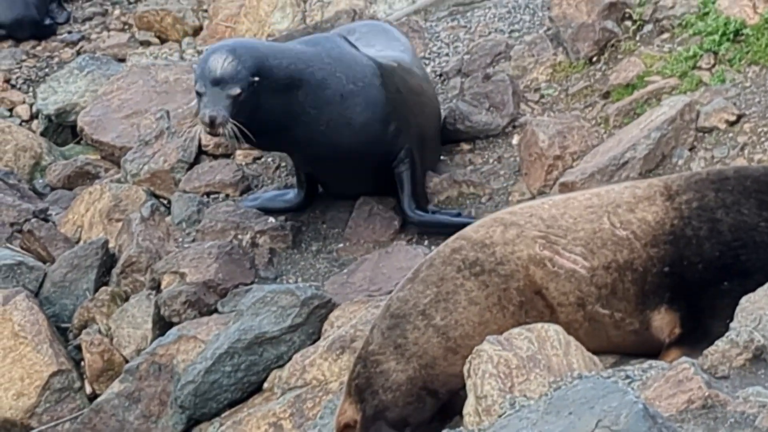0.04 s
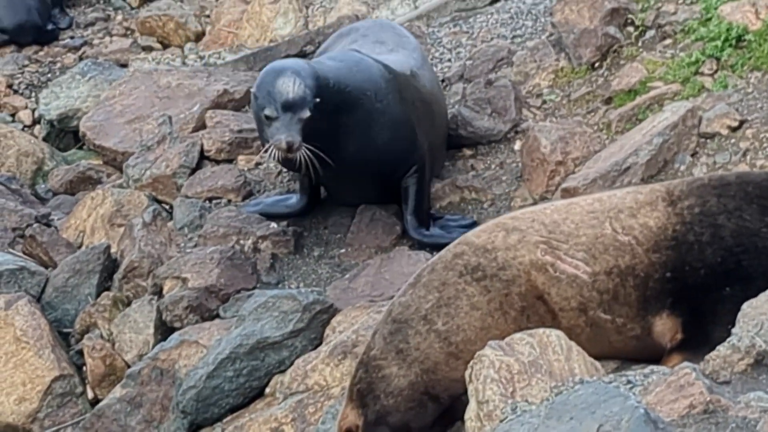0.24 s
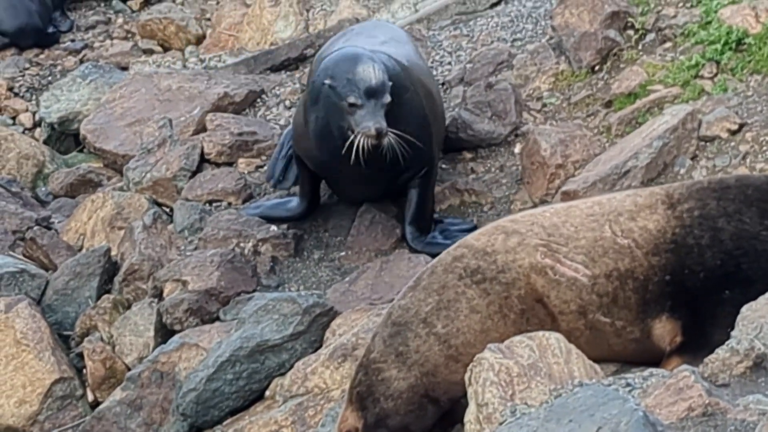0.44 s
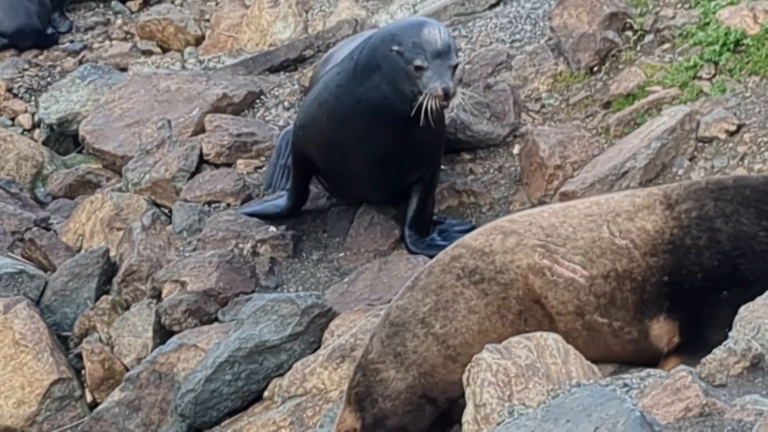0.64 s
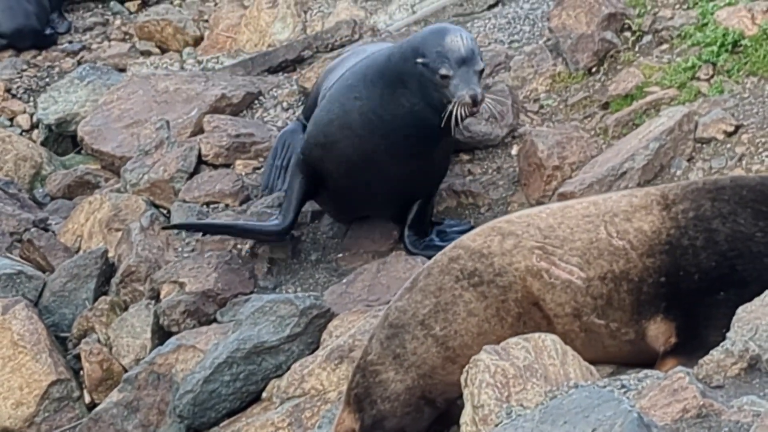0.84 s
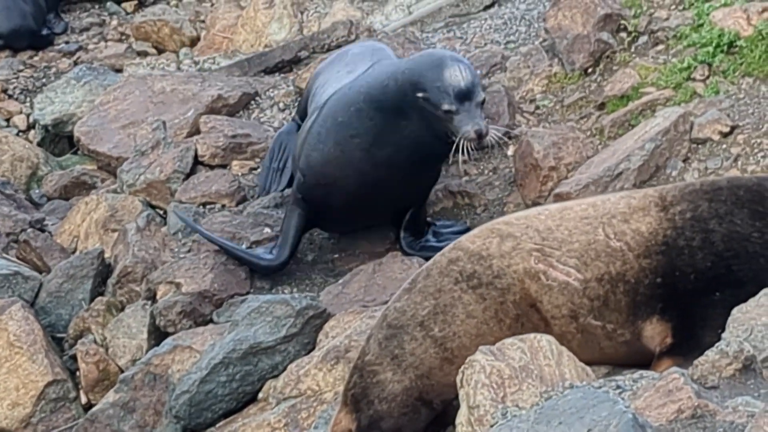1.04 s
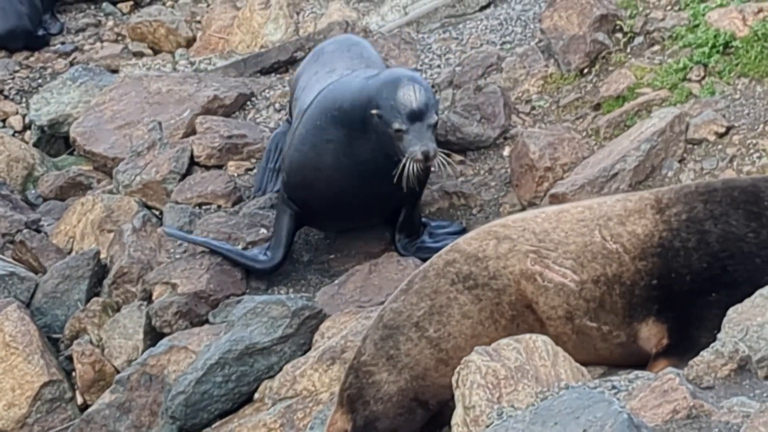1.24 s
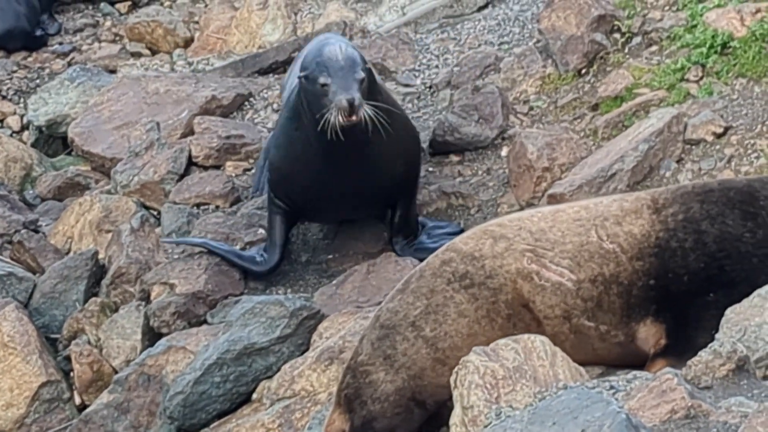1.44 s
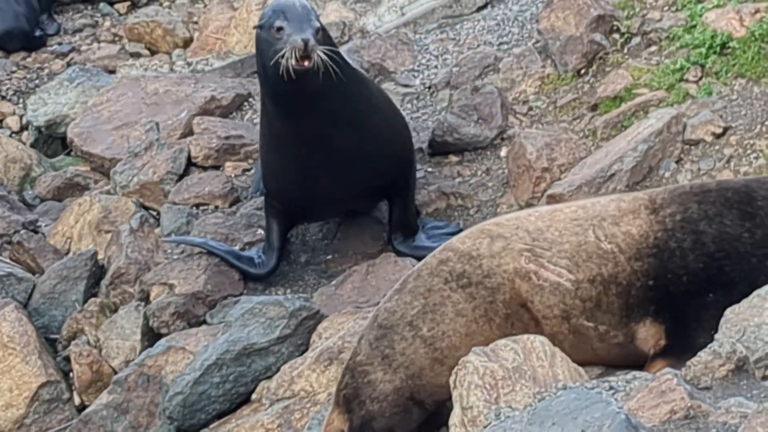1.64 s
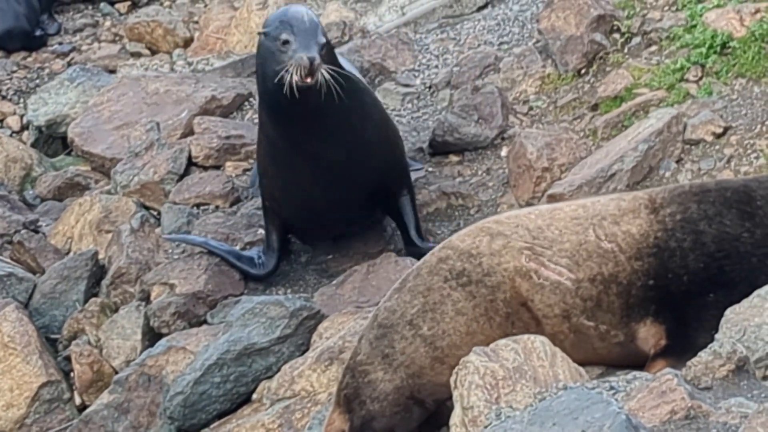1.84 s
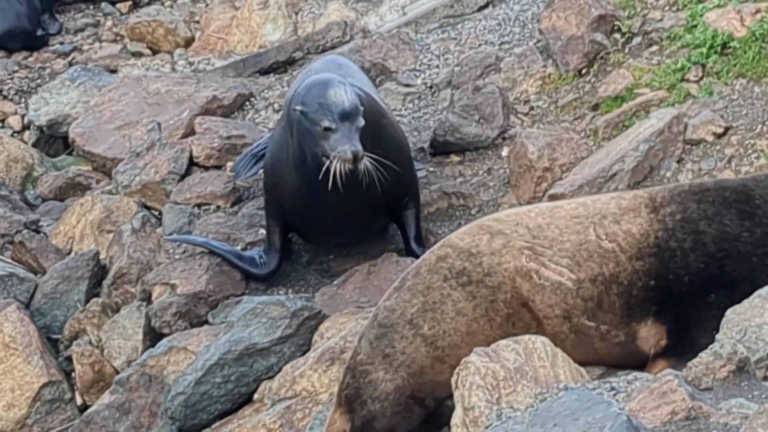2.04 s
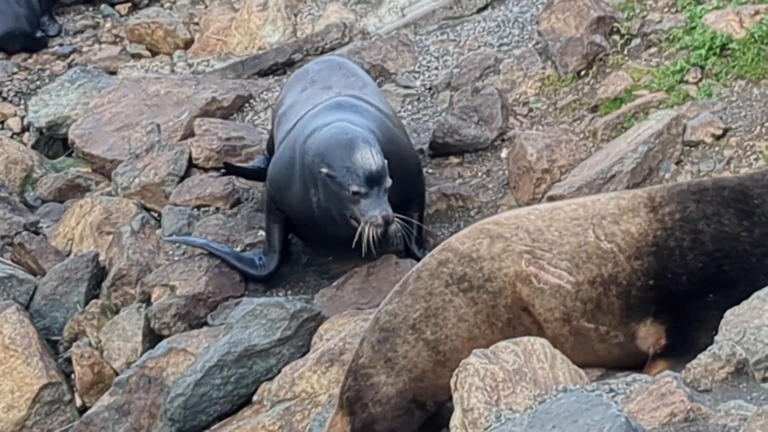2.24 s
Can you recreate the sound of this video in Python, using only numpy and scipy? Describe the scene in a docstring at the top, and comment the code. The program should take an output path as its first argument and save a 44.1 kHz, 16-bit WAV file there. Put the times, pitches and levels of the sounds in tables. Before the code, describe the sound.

A sea lion barks five times, about twice a second, each bark a loud, raspy honk. It is a few metres away on a rocky shore, with short echoes and faint surf and wind behind.

```python
"""A sea lion barks five times, twice a second, on a rocky shore a few metres away.
Each bark is a source and a filter: the vocal folds drive resonances of the throat and mouth, starting
in hoarse strong-weak pulses, clearing to a dipping pitched honk and fraying into breath.
Boulders scatter short echoes. Behind are a breath drawn in, a far call, a few small ticks
and the broadband noise of surf and wind."""
import sys
import numpy as np
from scipy import signal
from scipy.fft import rfft, irfft, next_fast_len
from scipy.io import wavfile
from scipy.ndimage import uniform_filter1d

SR = 44100
rng = np.random.default_rng(int(sys.argv[2]) if len(sys.argv) > 2 else 0)


def to_wav(sig):
    """Store sig (one row per channel, or 1-D mono) as 16-bit WAV at the path in sys.argv[1].

    Samples outside -1..1 are clipped; the rate is SR.
    """
    pcm = np.clip(np.atleast_2d(sig), -1, 1) * 32767
    pcm = np.round(pcm).astype(np.int16)
    wavfile.write(sys.argv[1], SR, pcm.T)  # frames by channels


N = 100195
T = np.arange(N) / SR

# Per bark, rows of: time_s, pitch_hz, voice_db, rasp_db, mouth_resonance_hz, upper_throat_gain_db
BARK_CONTOURS = [
    [(0, 249.8, -12.5, -22.5, 2650, -9), (.03, 250.9, -17, -24.5, 3050, -6.5),
     (.07, 249.5, -16, -24.5, 2740, -7.5), (.11, 248, -17.5, -25, 2900, -4),
     (.145, 245.5, -18.5, -27, 2930, 0), (.166, 240.2, -25, -23, 3200, -9.5),
     (.182, 243.3, -29.5, -35.5, 3180, 1), (.23, 242.6, -44.5, -48.5, 3080, -7)],
    [(.39, 248.7, -73, -58, 3000, 11), (.456, 248.5, -54, -37.5, 3080, 1),
     (.49, 264.5, -34, -36.5, 2930, -3), (.502, 268, -21.5, -27, 2920, 9),
     (.526, 261.8, -19, -28.5, 3070, 1), (.568, 228.2, -13.5, -29, 2870, 7.5),
     (.605, 241.1, -13, -28.5, 2630, -2.5), (.644, 265.3, -17, -28.5, 2540, 0),
     (.668, 246.2, -23, -31, 2600, 8), (.692, 239.5, -22.5, -33, 2620, -11),
     (.706, 249.3, -34, -40.5, 2830, 9), (.76, 231, -55, -47.5, 3240, 11)],
    [(.953, 264.5, -46, -43, 3020, 5), (.972, 265.3, -25, -30.5, 3030, 3),
     (.982, 261.7, -19, -26, 2990, 8.5), (1.001, 260.5, -14.5, -21.5, 2810, -6.5),
     (1.029, 248.8, -14.5, -30.5, 2870, 3.5), (1.061, 227.6, -17, -28.5, 2880, 10),
     (1.075, 228.1, -14.5, -32, 2850, 6), (1.095, 239.4, -14, -30.5, 2730, 10.5),
     (1.139, 257.8, -20.5, -32.5, 2900, 3.5), (1.183, 236, -26, -38.5, 3000, 3),
     (1.195, 237.7, -28.5, -70, 2940, -3), (1.24, 240, -37.5, -74, 3000, -3)],
    [(1.474, 254, -29.5, -34.5, 3000, -7), (1.486, 245.1, -19.5, -28, 2980, -10),
     (1.506, 243.2, -19, -25.5, 2830, 0), (1.524, 251.2, -14.5, -27.5, 2840, -6.5),
     (1.554, 223.6, -15.5, -23.5, 2950, -5.5), (1.57, 216.3, -15, -29.5, 3000, 0.5),
     (1.6, 221, -16.5, -26.5, 2940, -0.5), (1.638, 248, -12, -25, 2820, -1.5),
     (1.672, 255, -20.5, -31, 3050, 0.5), (1.692, 254, -20, -31.5, 2970, 1),
     (1.744, 251, -44, -72, 2980, -11), (1.76, 250, -45, -65, 3000, -2)],
    [(1.963, 280, -24, -47, 3100, -2), (1.969, 278.1, -26.5, -34.5, 3200, -4),
     (1.999, 275.8, -17, -26, 3000, 2), (2.045, 214.7, -15, -25.5, 2950, 7),
     (2.091, 225.4, -14.5, -28.5, 3060, 5.5), (2.139, 250.7, -16, -27.5, 2880, 0.5),
     (2.175, 251.8, -22, -31, 2880, -2.5), (2.203, 261, -27, -29, 3070, -1),
     (2.225, 270.6, -32.5, -38.5, 3000, 2), (2.263, 278, -53, -84, 3050, -1),
     (2.27, 274.6, -50, -75, 3050, 2)],
]
# Clear middle of each bark: start_s, end_s, hoarse_share
CLEAR_SPANS = [(.04, .13, .7), (.55, .655, .11), (1.04, 1.145, .17), (1.555, 1.65, .22), (2.025, 2.155, .2)]
# Per bark: hiss_db, relative to the rasp
HISS_OFFSETS = [-27, -14.5, -19.5, -19, -17.5]
def bark(contour, clear_span, hiss_db, throat_db, stretch, mouth_db):
    """Source-filter voicing: irregular fold vibration turns mostly periodic, then breaks up again."""
    times, pitch_hz, voice_db, rasp_db, mouth_hz, upper_db = np.transpose(contour)
    t = np.arange(times[0], times[-1], 1 / SR)
    pitch_hz = uniform_filter1d(np.interp(t, times, pitch_hz), 400)
    mouth_hz = uniform_filter1d(np.interp(t, times, mouth_hz), 800)
    upper_db = uniform_filter1d(np.interp(t, times, upper_db), 1500)
    clears, frays, share = clear_span
    turn_s, fade_s = .028, .003
    hoarse = np.interp(t, [clears - turn_s, clears, frays, frays + turn_s], [1, share, share, 1])
    cycles = np.cumsum(pitch_hz) / SR
    wobble, air, turbulence = rng.standard_normal((3, len(t)))
    rough, puffs = hoarse_folds(cycles, hoarse, wobble, air)
    honk = throat(periodic_folds(cycles), throat_db, stretch, upper_db, bass_db=0)
    growl = throat(rough, throat_db, stretch, upper_db, bass_db=-4)
    voice = -np.sqrt(1 - hoarse) * honk - np.sqrt(hoarse) * growl
    rasp = mouth_rasp(rough + .5 * turbulence, mouth_hz, mouth_db)
    hiss = breath_hiss(puffs + turbulence)
    layers = [(voice, voice_db), (rasp, rasp_db), (hiss, rasp_db + hiss_db)]
    sound = sum(x * gain_of(np.interp(t, times, db)) for x, db in layers)
    since_onset = t - times[0] + (times[0] == 0)  # the first bark is already under way
    sound *= np.clip(np.minimum(since_onset, times[-1] - t) / fade_s, 0, 1)
    out, start = np.zeros(N), round(times[0] * SR)
    out[start:start + len(t)] = sound[:N - start]
    return out


def periodic_folds(cycles, tilt_db=-3.3, spread_rad=.2):
    """Periodic vibration gives a harmonic series, each partial weaker and further out of step."""
    return sum(gain_of(tilt_db * k) * np.cos(2 * np.pi * k * cycles + spread_rad * k * k)
               for k in range(1, 8))


def hoarse_folds(cycles, hoarse, wobble, air, jitter_cycles=.13, weak_ratio=.4, breath_share=.42):
    """Period doubling: strong and weak pulses alternate, with jitter, shimmer and a puff of air each."""
    phase = cycles + hoarse * jitter_cycles * unit_rms(smooth(wobble, 150))
    cycle = np.maximum.accumulate(np.floor(phase)).astype(int)
    shimmer = gain_of(2.5 * rng.standard_normal(200)[cycle % 200])
    strength = np.where(cycle % 2, weak_ratio ** hoarse, 1) * shimmer
    pulses = np.diff(cycle, prepend=cycle[0]) * strength
    puffs = (.27 + strength * np.exp(-(phase % 1) / .24)) * air
    rough = np.sqrt(1 - breath_share) * unit_rms(pulses) + np.sqrt(breath_share) * unit_rms(puffs)
    return rough, puffs


# Throat resonances: centre_hz, width_hz
THROAT_FORMANTS = [(240, 390), (480, 149), (720, 196), (1020, 254), (1200, 167), (1380, 100)]
# Per bark: relative_db of each throat resonance
THROAT_GAINS = [(-56, 0, -3.5, -4.5, -9, -2.5), (-23, 0, -6, -6.5, -7.5, -9.5),
                (-19, 0, -4.5, -12.5, -13, -32), (-20, 0, 4, 0, -6, -2), (-12.5, 0.33, 2, -2.5, -3.5, -5.5)]
# Per bark: frequency_ratio raising the second and third resonances
THROAT_STRETCH = [1.25, 1.01, 1.01, 1.01, 1.01]
def throat(source, gains_db, stretch, upper_db, bass_db):
    """Formant filtering: parallel resonances of alternating polarity colour the fold pulses."""
    out = 0
    for k, ((hz, width), db) in enumerate(zip(THROAT_FORMANTS, gains_db)):
        centre_hz = hz * stretch if k in (1, 2) else hz
        gain = gain_of(db + (k == 0) * bass_db + (k > 1) * upper_db)
        out += (-1) ** k * gain * formant(source, centre_hz, width)
    return unit_loudness(out)


# Stationary mouth resonances: centre_hz, width_hz
MOUTH_FORMANTS = [(1800, 320), (2550, 170), (3500, 124), (4150, 135), (4900, 320)]
# Per bark: gain_db of each, relative to the moving resonance
MOUTH_GAINS = [(-9, -5, -5, -14, -16), (-12, -4, -10, -12, -14), (-12, -4, -10, -13, -22),
               (-11, -10, -9, -12, -20), (-11, -10, -7, -14, -22)]
def mouth_rasp(source, moving_hz, gains_db, moving_width_hz=290):
    """Cavity resonance: rough airflow excites five stationary mouth formants and a moving one."""
    formants = MOUTH_FORMANTS + [(moving_hz, moving_width_hz)]
    return unit_loudness(sum(gain_of(db) * resonate(resonate(source, hz, width), hz, 2 * width)
                             for (hz, width), db in zip(formants, gains_db + (0,))))


# Hiss spectrum: frequency_hz, relative_db
HISS_SPECTRUM = [(4000, -36), (5000, -25.5), (6300, 10), (6800, 10.5), (8000, 9), (10000, 5), (12000, 0),
                 (14000, -19), (15500, -32)]
def breath_hiss(air):
    """Turbulent breath gives a band of noise above the rasp."""
    return unit_loudness(filtered(air, lambda hz: gain_of(curve_at(HISS_SPECTRUM, hz))))


# Breath envelope: time_s, level_db
INHALE_LEVELS = [(1.17, -43), (1.21, -52), (1.32, -55), (1.44, -56), (1.47, -66)]
def inhale():
    """A narrow resonance makes fluttering air whistle through the nose between two barks."""
    times, db = np.transpose(INHALE_LEVELS)
    flutter = gain_of(4 * unit_rms(smooth(rng.standard_normal(N), 400)))
    whistle = formant(rng.standard_normal(N), hz=4750, width_hz=400)
    return unit_rms(whistle * flutter) * gain_of(np.interp(T, times, db, -120, -120))


# Level between channels: frequency_hz, left_minus_right_db
DIRECT_BALANCE = [(60, 1), (250, 0), (400, -3), (650, -.5), (1050, -3), (1690, -6), (2730, -13),
                  (4400, -14), (6500, -6), (9000, -1), (12000, 7)]
# Phase between channels: frequency_hz, left_lead_rad
DIRECT_PHASE = [(0, 0), (520, -.2), (860, -.9), (1550, -1.1), (1890, -1.4), (2150, -.3), (2500, 1),
                (2760, 0), (3190, .9), (3530, 0), (4300, -.6), (8000, -2)]
def direct_path(x):
    """Direct sound reaches two microphones with level and phase that depend on frequency."""
    half = np.array([[.5], [-.5]])
    return filtered(np.array([x, x]), lambda hz: gain_of(half * curve_at(DIRECT_BALANCE, hz))
                    * np.exp(1j * half * curve_at(DIRECT_PHASE, hz)))


def rock_echoes(x, t60_s=.09, low_cut_hz=600):
    """Scattering off boulders gives each channel its own sparse, exponentially decaying echoes."""
    t = np.arange(6000) / SR
    taps = rng.choice([-1., 1.], (2, len(t))) * (rng.random((2, len(t))) < .05)
    taps *= gain_of(-60 * t / t60_s) * (t > .002)
    taps /= np.linalg.norm(taps, axis=1, keepdims=True)
    x = filtered(x, lambda hz: 1 / (1 + (low_cut_hz / (hz + 1)) ** 2))
    return signal.fftconvolve(x[None], taps, axes=1)[:, :N]


# Distant call: time_s, pitch_hz, gain_db
FAR_CONTOUR = [(1.2, 346, -55), (1.24, 303.6, -41), (1.32, 325, -42), (1.4, 306, -51), (1.43, 320, -70)]
def far_call():
    """Noise bands at three harmonics give the blurred low pitch of another animal's call."""
    times, pitch_hz, gain_db = np.transpose(FAR_CONTOUR)
    hz, air = np.interp(T, times, pitch_hz), rng.standard_normal(N)
    tone = sum(gain_of(db) * unit_rms(formant(air, k * hz, width_hz))
               for k, db, width_hz in [(1, 3.5, 21), (2, 1, 360), (3, -12.5, 67)])
    return tone * gain_of(np.interp(T, times, gain_db, -120, -120))


# Ticks: start_s, gain_db
TICK_EVENTS = [(1.3694, -49), (1.8582, -54), (2.21, -36)]
def ticks(decay_s=.002):
    """Brief, damped noise bursts make bright ticks, perhaps grit under a flipper."""
    out, t = np.zeros(N), np.arange(300) / SR
    for start_s, db in TICK_EVENTS:
        burst = rng.standard_normal(len(t)) * np.exp(-t / decay_s)
        out[round(start_s * SR):][:len(t)] += gain_of(db) * burst
    return filtered(out, lambda hz: 1 / (1 + (6000 / (hz + 1)) ** 6) / (1 + (hz / 12000) ** 4))


# Surf and wind spectrum: frequency_hz, relative_db
SHORE_SPECTRUM = [(28, -45), (45, -83), (62, 1), (166, 2.5), (300, -7), (500, -13.5), (800, -19.5),
                  (1320, -23.5), (2500, -28.5), (4000, -27.5), (5000, -32.5), (7000, -40.5), (8000, -44.5),
                  (12000, -48), (15000, -62)]
# Swells: time_s, surf_gain_db, wind_gain_db
SHORE_SWELLS = [(0, -21.5, -48.5), (.3, -42.5, -52.5), (.6, -27, -50.5), (.85, -38.5, -50),
                (1.099, -34, -47.5), (1.3, -36, -49.5), (1.6, -36, -44), (1.85, -37.5, -45),
                (2.05, -40, -38.5), (2.27, -37, -43)]
# Likeness of the channels: frequency_hz, correlation
SHORE_COHERENCE = [(25, .5), (60, .8), (125, .97), (500, .85), (1500, .6), (4000, .4), (12000, .3)]
# Level between channels: frequency_hz, left_minus_right_db
SHORE_BALANCE = [(60, 1), (250, 0.5), (1000, -0.5), (2700, -8), (4400, -9.5), (8000, -8.5), (12000, 3)]
def surf_and_wind(crossover_hz=200, patch_db=2.03):
    """Partly coherent noise swells in random patches; the bass follows the wind, the rest the surf."""
    frames, hz = N // 256 + 5, np.fft.rfftfreq(1024, 1 / SR)
    t = np.arange(frames) * 256 / SR
    left_re, left_im, other_re, other_im, patches = rng.standard_normal((frames, len(hz), 5)).T
    left, other = left_re + 1j * left_im, other_re + 1j * other_im
    coherence = curve_at(SHORE_COHERENCE, hz)[:, None]
    right = coherence * left + np.sqrt(1 - coherence ** 2) * other
    patches = unit_rms(uniform_filter1d(uniform_filter1d(patches, 10, axis=0), 10, axis=1))
    times, surf_db, wind_db = np.transpose(SHORE_SWELLS)
    bass = 1 / (1 + (hz[:, None] / crossover_hz) ** 4)
    swell_db = bass * np.interp(t, times, wind_db) + (1 - bass) * np.interp(t, times, surf_db)
    side_db = np.outer([.5, -.5], curve_at(SHORE_BALANCE, hz))[..., None]
    db = curve_at(SHORE_SPECTRUM, hz)[:, None] + patch_db * patches + swell_db + side_db
    _, wash = signal.istft(np.array([left, right]) * gain_of(db), nperseg=1024, noverlap=768)
    return gain_of(28) / 32 * wash[:, :N]


def resonate(x, hz, width_hz):
    """Heterodyne resonator: shift hz down to zero, low-pass, and shift back."""
    carrier = np.exp(2j * np.pi * np.cumsum(hz * np.ones(len(x))) / SR)
    pole = np.exp(-np.pi * width_hz / SR)
    return 2 * (carrier * signal.lfilter([1 - pole], [1, -pole], x / carrier + 1e-18)).real


def formant(x, hz, width_hz):
    """Two resonators in cascade give a peak with steeper skirts."""
    return resonate(resonate(x, hz, width_hz), hz, width_hz)


def filtered(x, response):
    """Filtering multiplies the spectrum by a complex response, a function of Hz."""
    size = next_fast_len(N + 4096)
    return irfft(rfft(x, size) * response(np.fft.rfftfreq(size, 1 / SR)), size)[..., :x.shape[-1]]


def curve_at(points, hz):
    """Interpolation on a logarithmic frequency axis."""
    knots_hz, values = np.transpose(points)
    return np.interp(np.log(hz + 1), np.log(knots_hz + 1), values)


def gain_of(db):
    return 10 ** (np.asarray(db) / 20)


def smooth(x, samples):
    return uniform_filter1d(uniform_filter1d(x, samples), samples)


def unit_rms(x):
    return x / np.sqrt(np.mean(x ** 2) + 1e-20)


def unit_loudness(x):
    """Division by the running RMS flattens the envelope."""
    return x / np.sqrt(abs(smooth(x ** 2, 1200)) + 1e-12)


def scene():
    """Superposition of the sea lion, its echoes and the background, in stereo."""
    barks = zip(BARK_CONTOURS, CLEAR_SPANS, HISS_OFFSETS, THROAT_GAINS, THROAT_STRETCH, MOUTH_GAINS)
    sea_lion = sum(bark(*settings) for settings in barks) + inhale()
    echoes = gain_of(-9) * rock_echoes(sea_lion)
    return direct_path(sea_lion) + echoes + far_call() + ticks() + surf_and_wind()


def record(dry):
    """Band limiting: a linear-phase low-pass removes the highest treble."""
    low_pass = signal.firwin(255, cutoff=15300, window=("kaiser", 9), fs=SR)
    return signal.oaconvolve(dry, low_pass[None], "same")


dry = scene()
out = record(dry)
to_wav(out)
```